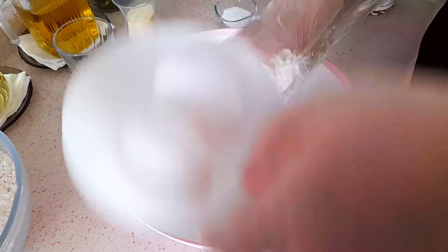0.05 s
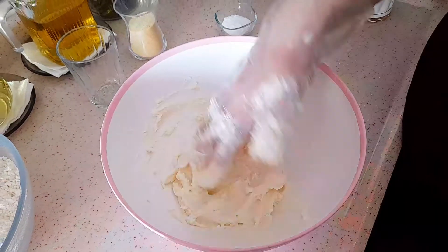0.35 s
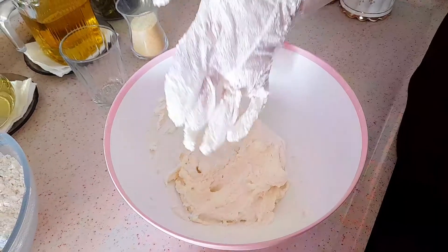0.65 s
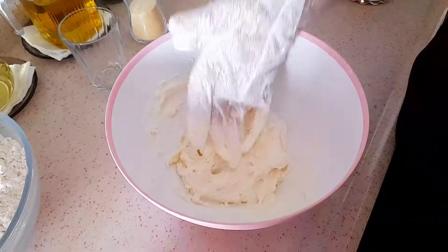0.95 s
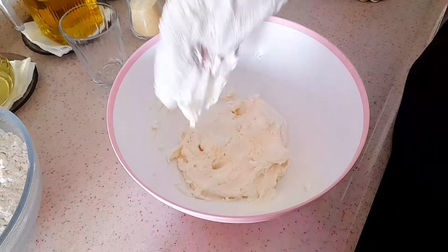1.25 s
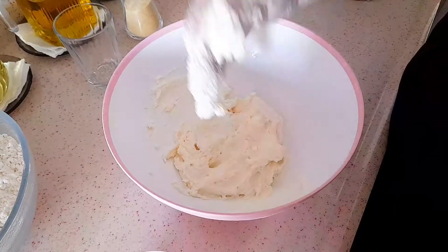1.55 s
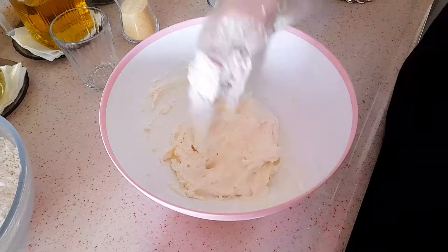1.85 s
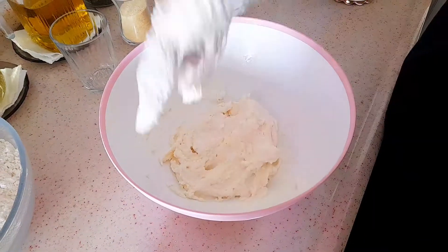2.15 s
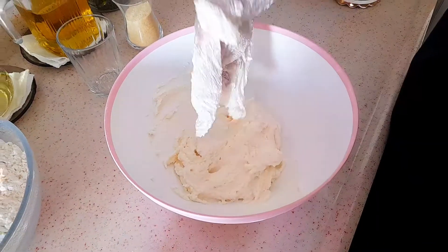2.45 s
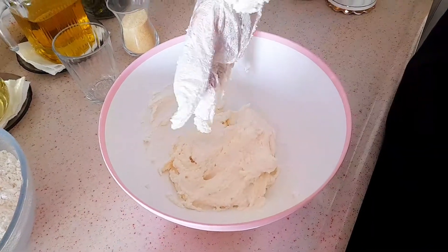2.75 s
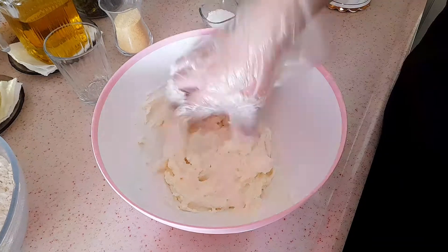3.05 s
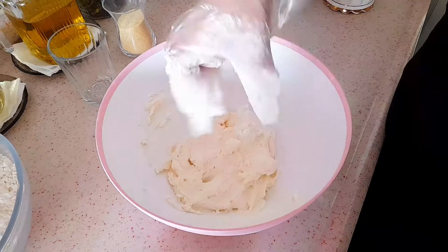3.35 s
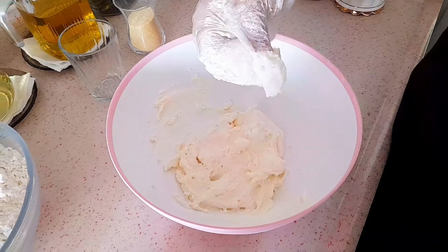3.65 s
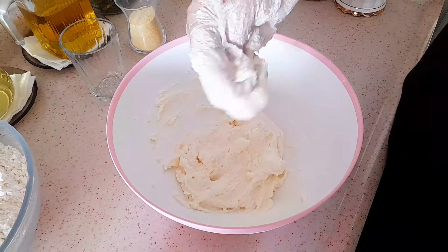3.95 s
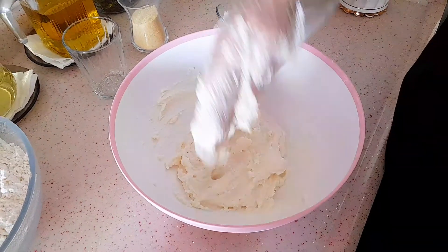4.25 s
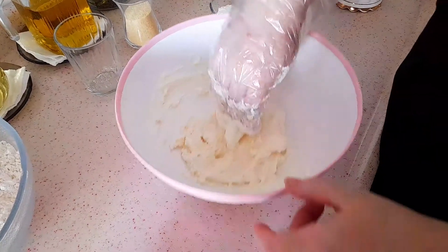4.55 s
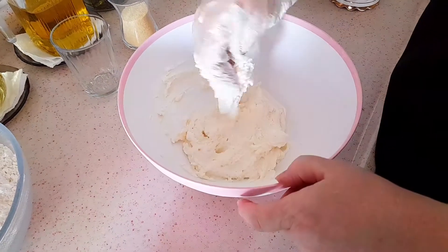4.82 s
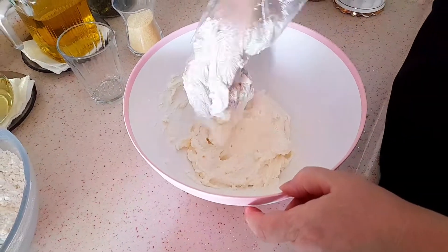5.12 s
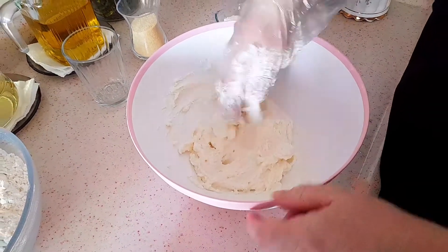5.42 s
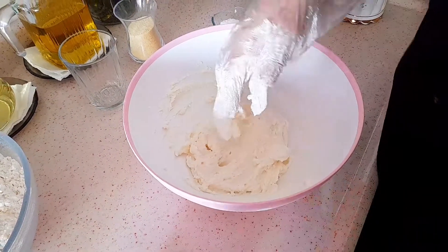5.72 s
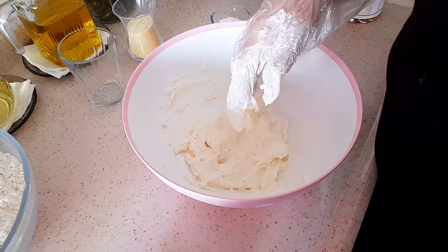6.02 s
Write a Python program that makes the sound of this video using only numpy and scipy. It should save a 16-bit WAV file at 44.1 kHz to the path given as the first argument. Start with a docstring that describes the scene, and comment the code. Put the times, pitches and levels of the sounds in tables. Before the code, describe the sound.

A thin plastic glove rustles through soft paste, with dull bowl bumps and a dish clattering down, over a low fridge hum.

```python
"""A hand in a thin plastic glove works soft paste in a mixing bowl: the film rustles by friction and
buckling, the paste ticks, and the bowl bumps softly. An arm stirs the air at first. To the left a dish
knocks down on the worktop and twice more as it settles, ringing in its modes, and the phone turns its
gain down for a while. A fridge hums throughout in the small, hard-walled kitchen."""
import sys
import numpy as np
from scipy import signal
from scipy.fft import rfft, irfft
from scipy.io import wavfile
from scipy.ndimage import uniform_filter1d, minimum_filter1d

SR = 44100
rng = np.random.default_rng(int(sys.argv[2]) if len(sys.argv) > 2 else 0)


def unload_audio(sound):
    """Save the sound as a 16-bit wav file, at the path given as the first command line argument."""
    columns = np.transpose(np.atleast_2d(sound))
    # keep every value between -1 and 1, then stretch to whole-number steps
    steps = np.round(np.clip(columns, -1, 1) * 32767)
    wavfile.write(sys.argv[1], SR, steps.astype(np.int16))


N = 268128
TIME = np.arange(N) / SR
BIN_HZ = np.maximum(np.arange(N // 2 + 1) * SR / N, 1)

# likeness of the sound at the two microphone ports: frequency_hz, coherence
COHERENCE = [(100, 0.91), (290, 0.86), (640, 0.49), (1400, 0.45), (3000, 0.22), (7000, 0)]
# fridge motor and mains tones: pitch_hz, rms_db, left_minus_right_db
HUM_TONES = [(48.1, -68, -9), (100.6, -47, 2.5), (170.5, -64, 9.5), (198.3, -65, 4), (245.5, -46, -1),
             (251, -64, -1), (297.3, -55.5, -7), (341.5, -58, -7), (393.3, -64, -13.5), (440.3, -61, -15),
             (581, -73, -9), (736, -75.5, 11), (764, -64.5, -1), (816.3, -57, 0.5), (1007, -62, 4)]
# strokes of the hand: fastest_s, swish_db, rise_s, fall_s, crinkle_re_swish_db
STROKES = [(0.295, -38, 0.079, 0.072, -3), (0.5, -49, 0.12, 0.16, -1.5), (0.79, -53.5, 0.14, .08, -2.5),
           (0.877, -36, 0.032, 0.04, 2), (0.97, -43.5, 0.056, 0.039, 6), (1.395, -38.5, 0.071, 0.092, 0),
           (1.765, -43, 0.12, 0.081, -1), (2.268, -41, 0.1, 0.051, -2.5), (2.565, -50.5, 0.07, 0.18, 2),
           (3.011, -44, 0.037, 0.075, -3), (3.09, -39, 0.066, 0.082, -3.5), (3.47, -48, 0.25, .36, -0.5),
           (3.89, -51, 0.082, 0.21, 2), (4.35, -45.5, 0.17, 0.26, -1), (4.815, -49.5, 0.19, 0.32, -2.5),
           (5.41, -50, 0.33, 0.13, 2.5), (5.69, -59, 0.057, 0.051, -4)]
# fingers closing on the film: start_s, level_db, length_s
SCRUNCHES = [(0.33, -47.5, 0.13), (2.247, -41, 0.055), (3.062, -38.5, 0.049), (4.974, -43.5, 0.073),
             (5.052, -46, 0.071), (5.204, -41.5, 0.045), (5.264, -46, 0.065), (5.4, -46, 0.054),
             (5.484, -42.5, 0.054)]
# the bowl bumping: start_s, level_db, length_s
BOWL_BUMPS = [(0.267, -43, 0.077), (0.928, -32.5, 0.15), (1.205, -34.5, 0.21), (3.088, -43, 0.048),
              (4.503, -42.5, 0.1), (4.6, -47, 0.063), (5.258, -36.5, 0.05), (5.387, -42.5, 0.15)]
# folds snapping over, plus two tiny, bright, sticky ticks: start_s, level_db, pitch_hz, t60_s
SNAPS_AND_TICKS = [(0.286, -33, 2680, 0.056), (1.369, -30, 3000, 0.044), (1.757, -30, 1300, 0.056),
                   (1.760, -33.5, 3200, 0.069), (1.986, -44, 6000, .012), (2.256, -32, 1500, 0.059),
                   (3.081, -27, 2290, 0.058), (3.089, -39, 3900, 0.043), (3.135, -31.5, 1460, 0.021),
                   (3.184, -37.5, 2340, 0.051), (3.88, -45, 2100, 0.05), (4.0, -46, 2150, 0.045),
                   (5.834, -47, 6500, 0.008)]
# spectrum of each such burst: ratio_to_pitch, gain_db
BURST_SPECTRUM = [(1 / 4, -22), (1 / 1.37, -6), (1, 0), (1.7, -8), (4, -24)]
# dish on worktop: start_s, level_db, brightness_hz, ring_db, tilt_db_per_octave, room_send_db
DISH_CONTACTS = [(0.9397, 2, 2560, -7, -1, -2.5), (1.1352, -1.5, 2400, -1.5, -1, -10),
                 (1.2283, 4.5, 4540, -5.5, 5, -0.5), (1.2325, -7, 4500, -1, 1, 6.5),
                 (1.2552, -16, 3400, -6, 5, 0), (1.2629, -2.5, 3370, -4, -4, -6),
                 (1.2723, -11.5, 3000, -2, -3, -3)]
# normal modes of the dish: pitch_hz, level_db, t60_s
DISH_MODES = [(387, -31, 0.2), (598, -38.5, 0.55), (853, -28, 0.3), (937, -18.5, 0.12), (1115, -32, 0.48),
              (1284, -30.5, 0.56), (1380, -16.5, 0.092), (1610, -38, 0.38), (1660, -29.5, 0.19),
              (1860, -30, 0.15), (1860, -26, 0.055), (2080, -5, 0.032), (2410, -7, 0.015),
              (2680, -33, 0.093), (3094, -32, 0.27), (3720, -30, 0.076), (4510, -33.5, 0.073)]

# spectra of the noises: frequency_hz, gain_db
ROOM_AIR_SPECTRUM = [(22, -30), (38, -12), (55, 5), (125, 0), (170, -9), (265, 5.5), (400, -8.5),
                     (600, -14.5), (1030, -2.5), (1400, -21), (3000, -26), (7000, -40), (9000, -47),
                     (15500, -45)]
DRAUGHT_SPECTRUM = [(25, -27), (45, -3), (70, 10), (110, -15), (300, -35), (1000, -37)]
SWISH_SPECTRUM = [(500, -11), (1500, -4.5), (3000, -5.5), (4200, -1), (5200, -2), (7000, 2), (8600, -6.5),
                  (10000, -5.5), (12500, 1.5), (16000, -7)]
CRINKLE_SPECTRUM = [(200, -5), (500, 2), (1000, -5), (1900, 6), (2600, 1.5), (4200, -1.5), (6000, -11),
                    (10000, -30)]
SCRUNCH_SPECTRUM = [(400, -21), (1100, -3), (2000, -2.5), (4400, -4.5), (6500, -18.5), (12000, -18.5)]
TICK_SPECTRUM = [(800, -25), (2500, -9), (5000, -1), (7000, 0), (9000, -6), (12500, 0), (16000, -4)]
BOWL_SPECTRUM = [(40, -15), (80, 3), (125, 9), (190, -11), (320, 4), (480, -12), (700, -5),
                 (1200, -13.5), (4000, -59)]
DISH_ECHO_SPECTRUM = [(60, -21), (130, -24), (470, -8), (595, 3), (700, -3.5), (900, 3.5), (1150, 4),
                      (1500, 6.5), (2000, 1.5), (3000, -5), (5000, -20), (9000, -8.5)]
# a bright, glassy click with a few treble peaks: frequency_hz, gain_db
GLASSY_CLICK_SPECTRUM = [(2000, -9), (4500, -1), (5100, -15), (6000, 2), (6700, -9), (7500, -1.5),
                         (8400, -13.5), (9700, -17), (10400, -11), (11200, -12), (12600, -8), (13300, -5),
                         (14300, -23), (15700, -5.5)]


def gain(db):
    """Amplitude grows tenfold for every 20 dB."""
    return 10 ** (np.asarray(db) / 20)


def over_bins(points):
    """Interpolation of a table along log frequency."""
    hz, value = np.transpose(points)
    return np.interp(np.log(BIN_HZ), np.log(hz), value)


def colour(x, spectrum):
    """Linear filtering weights each frequency; the result has rms 1."""
    shaped = irfft(rfft(x) * gain(over_bins(spectrum)), N)
    return shaped / shaped.std()


def pan(db):
    """A level difference, left minus right, gives direction."""
    return gain(np.array([[db], [-db]]) / 2)


def wander(rate_hz):
    """Smooth random modulation with a spread near 1."""
    knots = rng.standard_normal(int(N / SR * rate_hz) + 3)
    path = np.interp(TIME * rate_hz, np.arange(len(knots)), knots)
    return 1.25 * uniform_filter1d(path, int(SR / rate_hz / 2))


def diffuse_noise():
    """A diffuse field is coherent at both ports in the bass, incoherent in the treble."""
    mid, side = rfft(rng.standard_normal((2, N)))
    coherence = over_bins(COHERENCE)
    mid, side = mid * np.sqrt(1 + coherence), side * np.sqrt(1 - coherence)
    return irfft(np.array([mid + side, mid - side]), N) / np.sqrt(2)


def decay(t, t60_s):
    """Exponential damping: 60 dB in t60_s."""
    return np.exp(-np.log(1000) * t / t60_s)


def add(out, start_s, sound):
    """Superposition of a sound from start_s on."""
    i = int(start_s * SR)
    out[:, i:i + sound.shape[-1]] += sound[..., :N - i]


def kitchen(x, wet_db, t60_s):
    """Reverberation: reflections from tiles and cupboards follow the direct sound."""
    t = TIME[:SR // 2]
    tail = diffuse_noise()[:, :len(t)] * decay(t, t60_s) * (t > .004)
    tail *= gain(wet_db) / np.sqrt(np.sum(tail ** 2) / 2)
    return x + signal.fftconvolve(x, tail, axes=1)[:, :N]


def impulses(per_s, spread_db):
    """A Poisson process of tiny clicks, each radiated unequally to the two ports."""
    size = gain(spread_db * np.minimum(rng.exponential(size=N), 5))
    return (rng.random(N) < per_s / SR) * size * rng.standard_normal((2, N))


def fridge(air_db=-46, waver_db=1.18, drift_rad=0.47):
    """Forced vibration: motor and mains drive wavering tones, over a soft rush of air."""
    out = colour(diffuse_noise(), ROOM_AIR_SPECTRUM) * gain(air_db + .5 * wander(3.03))
    for hz, db, pan_db in HUM_TONES:
        tone = np.sqrt(2) * np.sin(2 * np.pi * hz * TIME + drift_rad * wander(5.13))
        out += tone * gain(db + waver_db * wander(6)) * pan(pan_db)
    return out


def draught(end_s=0.49, level_db=-47):
    """Turbulence: an arm sweeping past the phone stirs the air at its ports."""
    rumble = colour(diffuse_noise(), DRAUGHT_SPECTRUM)
    return rumble * gain(level_db) * np.clip((end_s - TIME) / 0.066, 0, 1)


def strokes(drop_db=8.5, roundness=1.35, fold_follow=0.87):
    """Friction noise follows the hand's speed; folds fade less than the swish as it slows."""
    sliding, folding = gain(-67), gain(-63)  # the film never lies quite still
    for fastest_s, db, rise_s, fall_s, fold_db in STROKES:
        from_peak = np.maximum((fastest_s - TIME) / rise_s, (TIME - fastest_s) / fall_s)
        sink_db = drop_db * from_peak ** roundness
        sliding = np.hypot(sliding, gain(db - sink_db))
        folding = np.hypot(folding, gain(db + fold_db - fold_follow * sink_db))
    return sliding, folding


def flicker(x, depth_db, rate_hz, bands=14):
    """Amplitude modulation: as the film changes shape, each band swells and sinks alone."""
    position = np.clip(np.log(BIN_HZ / 1000) / np.log(16), 0, 1) * (bands - 1)  # 1 to 16 kHz
    spectrum, out = rfft(x), 0
    for k in range(bands):
        band = irfft(spectrum * np.maximum(1 - np.abs(position - k), 0), N)
        out = out + band * gain(depth_db * wander(rate_hz))
    return out


def glove(grip_swish_db=-7):
    """Friction and buckling: sliding film swishes high, folds crinkle lower, fingers scrunch it."""
    sliding, folding = strokes()
    swish = colour(impulses(per_s=9000, spread_db=-1), SWISH_SPECTRUM) * pan(-1.6)
    swish *= gain(1.5 + 1.52 * wander(110))
    crinkle = colour(impulses(per_s=3000, spread_db=-1), CRINKLE_SPECTRUM) * pan(4.9)
    crinkle *= gain(-2.5 + 2.1 * wander(90))
    scrunch = colour(impulses(per_s=3000, spread_db=1), SCRUNCH_SPECTRUM) * pan(2.4)
    grip = np.zeros(N)
    for start_s, db, length_s in SCRUNCHES:
        progress = np.clip((TIME - start_s) / length_s, 0, 1)
        grip += gain(db) * np.sqrt(np.sin(np.pi * progress))
    film = swish * np.hypot(sliding, gain(grip_swish_db) * grip) + crinkle * folding + scrunch * grip
    film = flicker(film, depth_db=1.9, rate_hz=36) * gain(.9 * wander(45))
    return kitchen(film, wet_db=-9.5, t60_s=0.2)


def paste_ticks():
    """Adhesion fails in faint, sparse ticks as tacky paste lets go of the film."""
    ticks = colour(impulses(per_s=16, spread_db=1), TICK_SPECTRUM)
    return kitchen(ticks * gain(-71), wet_db=5, t60_s=0.048)


def bowl():
    """Damped impact: the hand presses the paste and the bowl bumps dully on the worktop."""
    boom = colour(diffuse_noise(), BOWL_SPECTRUM)
    envelope = np.zeros(N)
    for start_s, db, length_s in BOWL_BUMPS:
        age = np.maximum(TIME - start_s, 0) / (length_s / 3)
        envelope += gain(db) * age * np.exp(1 - age)
    return boom * envelope


def snaps_and_ticks():
    """Damped transients: buckling folds and two sticky ticks, each a noise burst around one pitch."""
    out, t = np.zeros((2, N)), TIME[:SR // 6]
    noise = diffuse_noise()
    for start_s, db, hz, t60_s in SNAPS_AND_TICKS:
        band = colour(noise, [(hz * ratio, gain_db) for ratio, gain_db in BURST_SPECTRUM])
        burst = np.roll(band, -int(start_s * SR), axis=1)[:, :len(t)]
        add(out, start_s, gain(db) * burst * decay(t, t60_s))
    return kitchen(out * pan(2.4), wet_db=-3, t60_s=0.36)


def dish(thud_s=0.00061, port_lag_s=0.00023, early_db=-13, room_db=-21):
    """Impact excites normal modes: each contact thuds, clicks, rings and echoes off worktop and walls."""
    out, t = np.zeros((2, N)), TIME[:SR * 3 // 4]
    age = np.maximum(t - np.array([[0], [port_lag_s]]), 0)  # the left port hears it first
    shade = gain([[1], [-5]])  # and louder
    noises = np.array([colour(diffuse_noise(), DISH_ECHO_SPECTRUM),
                       colour(diffuse_noise(), GLASSY_CLICK_SPECTRUM)])
    for start_s, db, brightness_hz, ring_db, tilt_db, send_db in DISH_CONTACTS:
        echo, click = np.roll(noises, rng.integers(N), axis=2)[..., :len(t)]
        hardness = np.log2(brightness_hz / 3000)  # harder contact: higher thud, louder click
        click = click * gain(-37 + 8 * hardness) * decay(t, t60_s=0.26)
        thud_hz = 1600 * 2 ** (0.26 * hardness)
        thud = shade * age / thud_s * np.exp(1 - age / thud_s) * np.sin(2 * np.pi * thud_hz * age)
        ring = np.zeros_like(age)
        for hz, mode_db, t60_s in DISH_MODES:
            # a flat landing favours the low modes, an edge the high ones
            size = gain(ring_db + mode_db + tilt_db * np.log2(hz / thud_hz))
            ring += size * decay(age, t60_s) * np.sin(2 * np.pi * (hz * age + rng.random()))
        early = gain(early_db) * decay(t, t60_s=0.051)
        late = gain(room_db + send_db) * decay(t, t60_s=0.53) * np.minimum(t / .008, 1)
        tail = (ring * pan(3.1) + echo * np.hypot(early, late) * pan(0.49)) * np.minimum(t / 0.0015, 1)
        lowpass = signal.butter(7, brightness_hz, fs=SR, output="sos")  # softer contact, less treble
        add(out, start_s, gain(db) * (signal.sosfilt(lowpass, thud + tail) + click))
    return out


def air_pocket(start_s=5.8335, level_db=-39, pitch_hz=5850, t60_s=.022):
    """Damped oscillation: a tiny air pocket bursts in the paste."""
    out, t = np.zeros((2, N)), TIME[:SR // 10]
    add(out, start_s, gain(level_db) * decay(t, t60_s) * np.sin(2 * np.pi * pitch_hz * t))
    return out


def scene():
    """Superposition: the pressures of all sources add at the worktop."""
    return (glove() + snaps_and_ticks() + air_pocket() + dish() + bowl()
            + draught() + fridge() + paste_ticks())


def record(dry, ceiling_db=0.8, hold_s=1.18, release_db_per_s=7.5, cutoff_hz=15900):
    """Automatic gain control drops at once on a peak, holds, then recovers; a low-pass cuts the top."""
    peak_db = 20 * np.log10(np.abs(dry).max(axis=0) + 1e-9)
    excess_db = np.maximum(peak_db - ceiling_db, 0)
    half_hold = int(hold_s * SR / 2)
    held_db = -minimum_filter1d(-excess_db, 2 * half_hold + 1, origin=half_hold, mode="constant")
    recovery_db = release_db_per_s * TIME
    cut_db = np.maximum.accumulate(held_db + recovery_db) - recovery_db
    lowpass = signal.ellip(10, .1, 80, cutoff_hz, fs=SR, output="sos")
    return signal.sosfilt(lowpass, dry * gain(-cut_db))


dry = scene()
out = record(dry)
unload_audio(out)
```